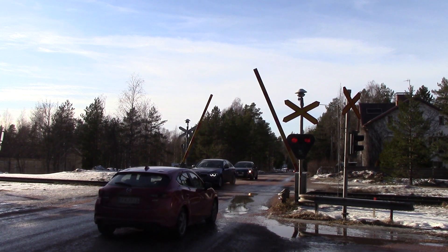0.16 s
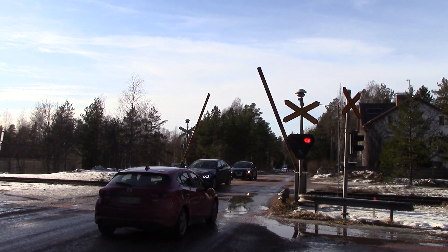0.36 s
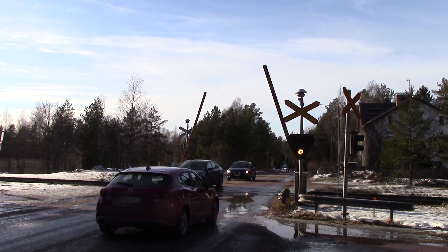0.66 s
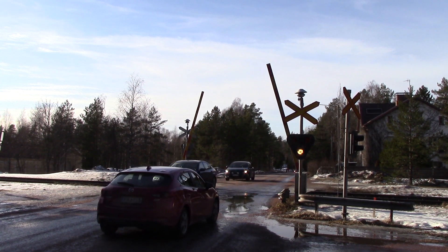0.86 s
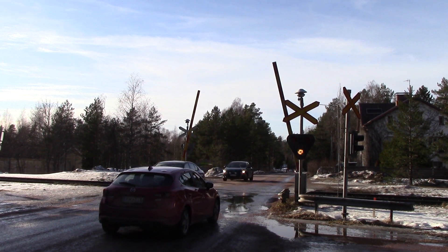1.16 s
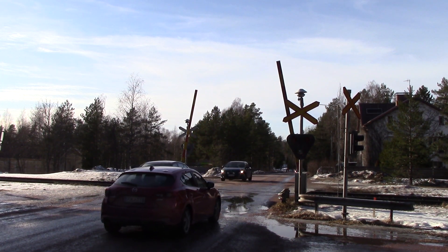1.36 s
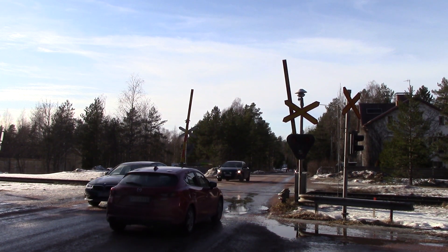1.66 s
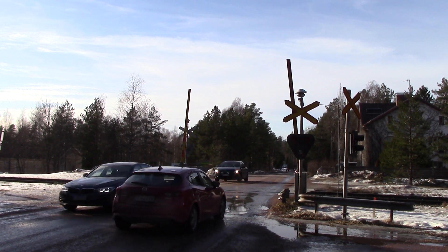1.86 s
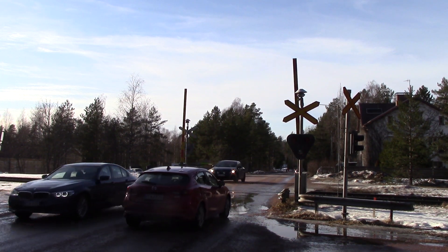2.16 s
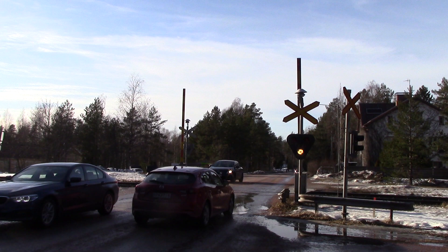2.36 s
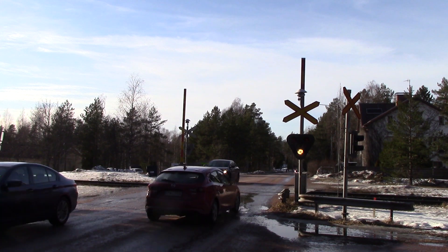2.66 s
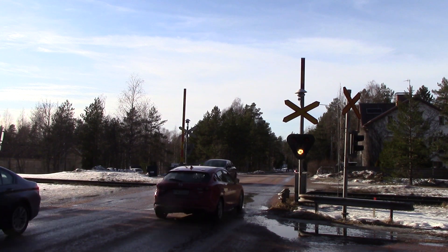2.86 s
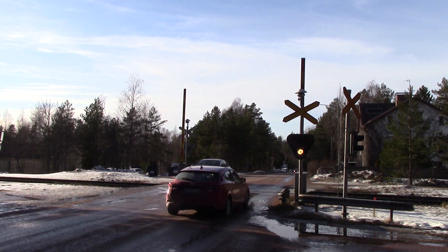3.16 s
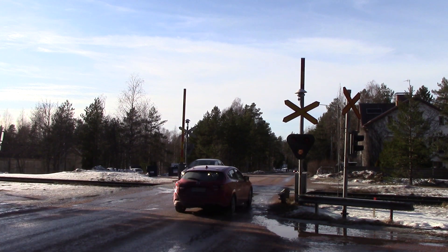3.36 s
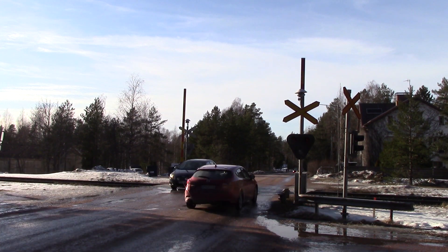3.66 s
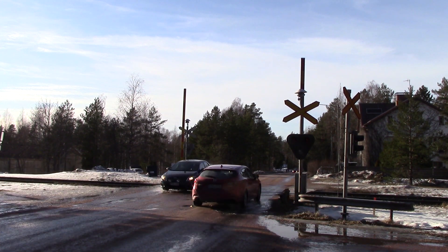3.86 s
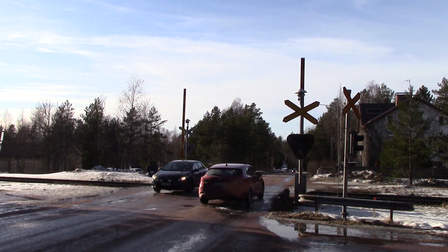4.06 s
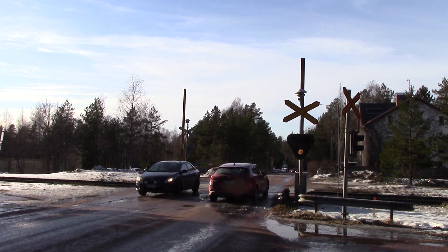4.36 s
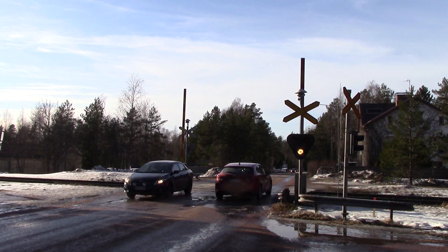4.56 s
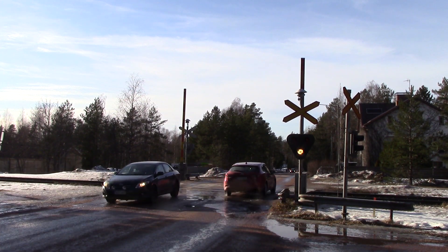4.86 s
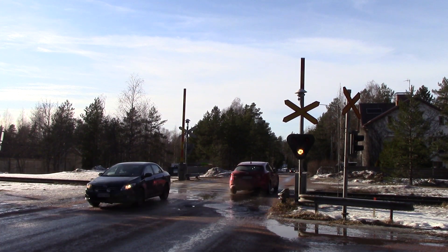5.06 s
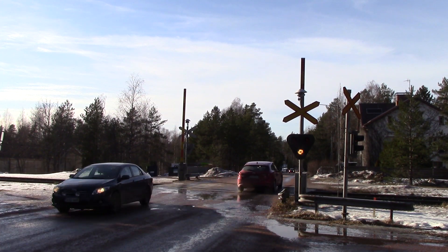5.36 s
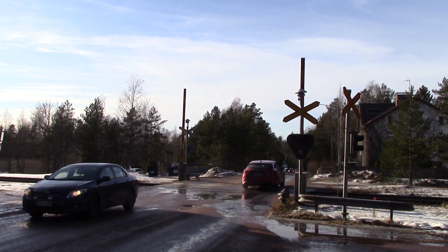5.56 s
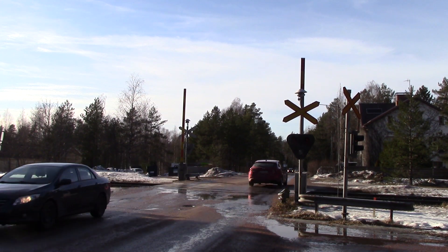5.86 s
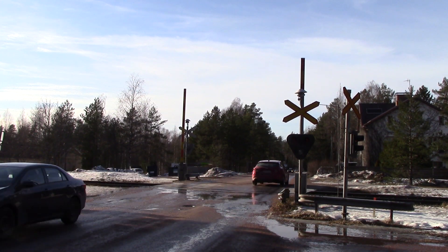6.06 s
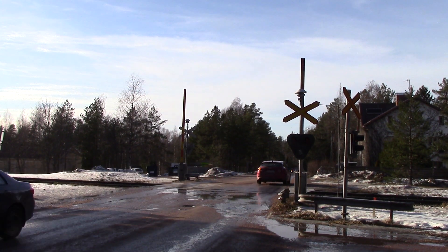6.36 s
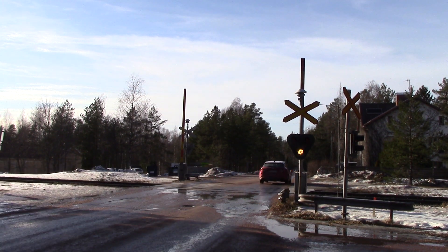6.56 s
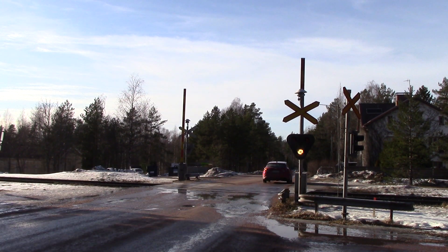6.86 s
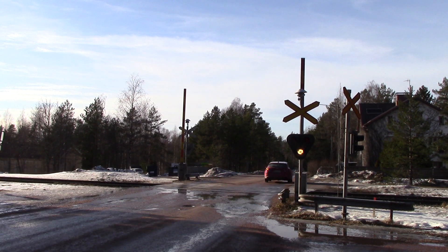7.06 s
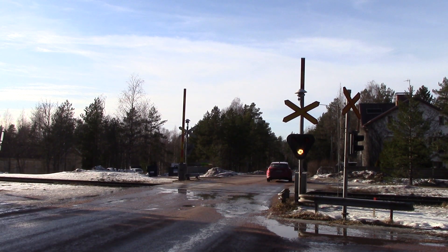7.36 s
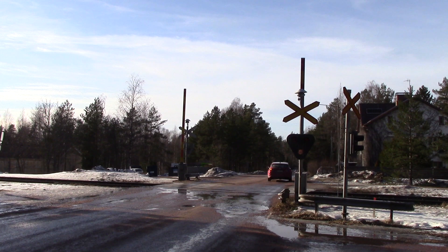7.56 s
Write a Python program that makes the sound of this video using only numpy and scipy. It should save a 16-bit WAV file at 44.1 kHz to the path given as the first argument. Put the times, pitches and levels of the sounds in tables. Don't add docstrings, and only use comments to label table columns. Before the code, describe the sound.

Outdoors at a wet rail crossing, a waiting car hums briefly while another rolls over the rails with dull body thumps and small splashes. It passes on the left in a rush of water hiss and eases away. A second car follows, louder and grittier, its tyres crackling sharply close by. A small stereo microphone stands at the roadside with faint distant traffic behind.

```python
import sys
import numpy as np
from scipy import signal
from scipy.fft import rfft, irfft, next_fast_len
from scipy.io import wavfile
from scipy.ndimage import uniform_filter1d

SR = 44100
rng = np.random.default_rng(int(sys.argv[2]) if len(sys.argv) > 2 else 0)


def nominal_scale(level):
    x = np.asarray(level, float) / 20
    return 10 ** x


def to_wav(sig):
    pcm = np.clip(np.atleast_2d(sig), -1, 1) * 32767
    pcm = np.round(pcm).astype(np.int16)
    wavfile.write(sys.argv[1], SR, pcm.T)


N = 340363
T = np.arange(N) / SR
SIZE = next_fast_len(N, True)
HZ = np.fft.rfftfreq(SIZE, 1 / SR) + 1e-3

# low_hz, high_hz
BANDS_HZ = [(70, 170), (170, 380), (400, 800), (900, 1350), (1400, 2100), (2300, 4200), (4800, 6800),
            (7000, 9000), (9500, 12000), (12500, 15000)]
# time_s, how far round to the left (0-1), sound from all round_db
BEARING = [(0, 0.2, 3), (1, 0.14, 6), (1.8, 0, 3), (2.5, 0.13, -3), (3.2, 0.46, -4), (3.9, 0.89, -14),
           (4.5, 0.45, -8), (5.1, 0.14, -2), (5.8, 0.1, 1), (6.4, 0.45, -5), (7, 1, -3), (7.4, 1.1, 1),
           (7.72, 0.9, 4)]


def curve(table):
    s, *columns = np.transpose(table)
    return [np.interp(T, s, column) for column in columns]


def colour(points):
    hz, db = np.transpose(points)
    return nominal_scale(np.interp(np.log(HZ), np.log(hz), db))


def tint(x, gain):
    return irfft(rfft(x, SIZE) * gain, SIZE)[..., :N]


def ring(x, hz, q):
    b, a = signal.iirpeak(hz, q, SR)
    return signal.lfilter(b, a, signal.lfilter(b, a, x))


def knock(t, hz, t60, rise):
    swell = (1 - np.exp(-t / rise)) * np.exp(-np.log(1000) * t / t60)
    wave = swell * np.sin(2 * np.pi * hz * t * (1 + 0.033 * t / t60))
    return wave / wave.max()


def fade(x, t60):
    return signal.lfilter([1], [1, -np.exp(-np.log(1000) / (t60 * SR))], x)


def walk(rate):
    hold = int(SR / rate)
    steps = np.repeat(rng.standard_normal(N // hold + 1), hold)
    smooth = uniform_filter1d(uniform_filter1d(steps, hold), hold)[:N]
    return smooth / smooth.std()


def bursts(rate, spread_db, t60):
    when, size = rng.random((int(rate * N / SR), 2)).T
    kicks = np.zeros(N)
    np.add.at(kicks, (when * (N - 1)).astype(int), nominal_scale(-spread_db * np.log(1 - size)))
    swell = np.sqrt(fade(kicks, t60) + 1e-9)
    return (swell - swell.mean()) / swell.std()


def waiting_car():
    hum = 0
    for hz, q, db in [(590.0, 2.1, -13.5), (1660.0, 8.8, -16)]:
        hum = hum + nominal_scale(db) * ring(rng.standard_normal(N), hz, q)
    return hum * np.interp(T, [1.2, 2.2], [1, 0])


def thumps():
    # start_s, peak_db, pitch_hz
    drops = [(0.865, -22.5, 274), (0.899, -29, 264), (1.079, -20, 242), (1.115, -22, 264),
             (1.168, -26, 264), (1.252, -34, 218), (1.314, -18.5, 172), (1.414, -27, 383),
             (1.475, -21, 263), (1.507, -27, 262), (1.545, -23, 262), (1.574, -20, 261), (1.611, -14, 295),
             (1.63, -14, 204), (1.743, -23, 186), (3.299, -35, 310), (3.504, -25, 266), (3.544, -25, 210),
             (3.789, -28, 301), (3.843, -24, 300), (3.896, -22, 298), (3.959, -20, 312),
             (4.012, -19.5, 292), (4.049, -18, 293), (4.199, -38, 280), (7.419, -31, 342)]
    out, t = np.zeros(N + SR), np.arange(int(.08 * SR)) / SR
    for s, peak_db, hz in drops:
        i = int(s * SR)
        out[i:i + len(t)] += nominal_scale(peak_db + 2.3) * knock(t, hz, t60=0.028, rise=0.0025)
    return out[:N]


def splashes():
    # start_s, peak_db, fade by 60 dB_s, brightest_hz
    puddles = [(0.602, -19.5, 0.3, 5340), (0.6767, -22, 0.21, 6050), (0.81, -23.5, 0.17, 5720),
               (0.85, -23, 0.3, 7300), (0.956, -17.5, 0.16, 7700), (1.096, -22.5, 0.22, 4920),
               (1.187, -20, 0.23, 5500), (1.2585, -34, 0.3, 4760), (1.4246, -21.5, 0.49, 5360),
               (1.4832, -18.5, 0.57, 6200), (1.7183, -30, 0.21, 5700), (2.394, -26, 0.26, 5800),
               (2.5766, -18, 0.18, 7400), (3.4203, -16, 0.13, 6910), (3.829, -14.5, 0.3, 5900),
               (4.5994, -36, 0.3, 4790), (4.8524, -19.5, 0.96, 6060)]
    out, t = np.zeros(N + SR), np.arange(int(.4 * SR)) / SR
    for s, db, t60, hz in puddles:
        swell = (1 - np.exp(-t / 0.00051)) * np.exp(-np.log(1000) * t / t60)
        bright, dull = rng.standard_normal((2, len(t))) * swell
        i = int(s * SR)
        out[i:i + len(t)] += nominal_scale(db - 3) * (ring(bright, hz, 1.53) + 1.77 * ring(dull, 2880.0, 1.4))
    shade = [(3800, 3.0), (4800, 1.0), (5900, 0.5), (8500, 1.0), (12000, -10), (16000, -14)]  # (Hz, dB)
    return tint(out[:N], colour(shade))


def grit(cavity_db):
    when, size, pitch = rng.random((1400, 3)).T
    out = 0
    for k, (hz, db) in enumerate([(1050., -12), (1500., 6.0), (2300., 10.5), (3300., -8)]):
        kicks = np.zeros(N)
        mine = (pitch * 4).astype(int) == k
        strength = nominal_scale(db - 4.4 * np.log(1 - .97 * size[mine]))
        np.add.at(kicks, (when[mine] * (N - 1)).astype(int), strength)
        out = out + ring(kicks, hz, 1.12)
    return out * nominal_scale(cavity_db + 20.0)


def cracks(cavity_db):
    # start_s, peak_db, ring_hz
    first = [(0.118, -7, 1200), (0.183, -7, 1170), (0.341, -20, 1700), (0.405, -16, 1330),
             (0.454, -18, 969), (0.527, -15, 1670), (0.717, -16, 1610), (0.761, -15, 1290),
             (1.094, -16, 1210), (1.164, -12, 1270), (1.245, -10, 1730), (1.305, -15, 1590),
             (1.389, -14, 1180), (1.411, -11, 1160), (1.566, -6, 1190), (1.587, -12, 1210),
             (1.619, -6, 1180), (1.741, -12, 1050), (2.19, -8, 1950), (2.545, -12, 1050), (2.579, -9, 1150),
             (2.881, -8, 2740), (3.01, -8, 1590), (3.378, -6, 3400)]
    # start_s, peak_db, ring_hz
    coming = [(4.124, -9, 1250), (4.324, -9, 1840), (4.531, -4, 1320), (4.542, -9, 1710), (4.652, -7, 1500),
              (4.835, -9, 1320), (4.852, -1, 1710), (5.049, -9, 1170), (5.098, -2, 1320), (5.138, -2, 1600),
              (5.178, -6, 1200), (5.197, -3, 1280), (5.255, -7, 1280), (5.3, -8, 1750), (5.31, -3, 1440),
              (5.372, -4, 1880), (5.428, -4, 1410), (5.436, -3, 1740), (5.607, -8, 1250), (5.688, -6, 1300),
              (5.727, 1, 1170), (5.764, -1, 1660), (5.771, -5, 1730), (5.776, -5, 1060), (5.822, -9, 1290),
              (5.874, -5, 1290), (5.928, -7, 1300), (6.01, 0, 1400), (6.032, -3, 1290), (6.097, -1, 1150)]
    # start_s, peak_db, ring_hz
    alongside = [(6.42, -1, 2070), (6.452, -2, 1590), (6.477, -2, 1610), (6.502, 0, 1100),
                 (6.548, -3, 1490), (6.567, -2, 1230), (6.622, -3, 1070), (6.691, -4, 1130),
                 (6.731, -2, 1180), (6.793, -4, 1030), (6.825, 0, 1350), (6.83, -2, 1100), (6.861, 0, 1060),
                 (6.866, -4, 1830), (6.883, -3, 1250), (6.894, -3, 1360), (6.917, -1, 1100),
                 (6.966, -1, 1130), (6.995, -3, 1170), (7.098, -1, 1160), (7.14, -3, 1930),
                 (7.178, -1, 1220), (7.213, 1, 1340), (7.264, -5, 1030), (7.32, 0, 1080), (7.344, -4, 1000),
                 (7.407, -6, 1590), (7.51, -4, 1230), (7.548, -1, 1220), (7.63, -3, 1400)]
    late_s, cycles, road_peaks_db = .0006, 10, 13
    out, t = np.zeros(N + SR), np.arange(int(.06 * SR)) / SR
    sagging = t + .45 * .001 * (1 - np.exp(-t / .001))
    for s, db, hz in list(first) + list(coming) + list(alongside):
        scatter = rng.standard_normal(len(t)) * (1 - np.exp(-t / .002)) * np.exp(-t / .011)
        rattle = nominal_scale(2 + .5 * db) * ring(scatter, hz, .9)
        snap = 1.25 * knock(sagging, .9 * hz, cycles / hz, .0004)
        tick = .45 * knock(t, min(1.9 * hz, 3200), .0025, .0002)
        i = int((s + late_s) * SR)
        power = nominal_scale(2 * db) - nominal_scale(2 * (cavity_db[i] + road_peaks_db))
        size = np.sqrt(max(power, .2 * nominal_scale(2 * db)))
        out[i:i + len(t)] += size * (snap + tick + rattle)
    band = signal.butter(2, [480, 4500], "bandpass", fs=SR, output="sos")
    return signal.sosfilt(band, out[:N])


def band_centres():
    return np.log([np.sqrt(lo * hi) for lo, hi in BANDS_HZ])


def band_levels():
    # time_s, rolling_db, water thrown_db
    first_car = [
        (0, -7, -23),
        (0.7, -9.5, -20.5),
        (1.3, -2, -12.5),
        (1.9, -3.5, -5.5),
        (2.4, -4, 0.5),
        (3.0, 0, 0.5),
        (3.9, -1, 1),
        (4.7, -4, -0.5),
        (7.72, -30, -25),
    ]
    # time_s, rolling_db, water thrown_db
    second_car = [
        (0, -28, -40),
        (3.6, -17, -24),
        (4.7, -6, -9.5),
        (5.3, -2, -3.5),
        (5.8, -2, -1.5),
        (6.4, 1, 1.5),
        (6.9, 2.2, 3),
        (7.3, 1, -2.5),
        (7.72, -0.5, -10),
    ]
    # time_s, level_db
    rumble = [(0, -14), (.75, -10), (1.03, 0), (1.4, -2.5), (1.61, 8), (1.76, -8), (2.1, -17), (2.6, -17),
              (2.95, -9), (3.3, -7), (3.5, -1), (3.93, 0), (4.25, -6), (4.5, -13), (5.5, -13), (6.3, -6),
              (7.2, -4), (7.72, -6)]
    # pitch_hz, band level_db
    first_tread = [(110, -51), (250, -52.5), (570, -34.5), (1100, -30.5), (1700, -27), (3100, -31),
                   (5700, -53), (14000, -80)]
    second_tread = [(110, -63), (250, -40), (570, -35.5), (1100, -24.5), (1700, -21), (3100, -27.5),
                    (5700, -44), (14000, -75)]
    # pitch_hz, band level_db
    first_water = [(570, -61), (1700, -35), (3100, -25.5), (5700, -33.5), (7900, -35), (10700, -43),
                   (14000, -56)]
    second_water = [(570, -63), (1700, -38), (3100, -25.5), (5700, -34.5), (7900, -31), (10700, -42),
                    (14000, -57.5)]
    # pitch_hz, band level_db
    body = [(110, -45), (250, -32.5), (570, -38.5), (1100, -55), (14000, -120)]
    # pitch_hz, band level_db
    far_traffic = [(110, -62), (250, -55), (570, -32), (1100, -40), (3100, -73), (7900, -50.5),
                   (14000, -72)]
    # pitch_hz, gain_db
    from_left = [(110, 2.7), (1100, 1.6), (1700, -2.1), (3100, 1.15), (5700, 2), (7900, -5.5), (10700, -4),
                 (14000, 6)]
    centres = band_centres()

    def at(points):
        hz, db = np.transpose(points)
        return np.interp(centres, np.log(hz), db)[:, None]

    roll1, wet1 = curve(first_car)
    roll2, wet2 = curve(second_car)
    shake, = curve(rumble)
    parts = [at(first_tread) + roll1, at(first_water) + wet1,
             at(second_tread) + roll2, at(second_water) + wet2,
             at(body) + shake, at(far_traffic) + 0 * T]
    power = sum(nominal_scale(2 * part[:, ::64]) for part in parts)
    total_db = 10 * np.log10(power).repeat(64, axis=1)[:, :N]
    return total_db + at(from_left) * curve(BEARING)[0]


def road(levels):
    # pitch_hz, db per Hz
    low = [(24, -68), (40, -13), (130, -0.5), (246, -4), (393, -8), (436, -4.5), (475, -4.5), (555, -2.5),
           (707, -4.5), (1020, 0), (1300, 0), (1860, -1), (2500, -2), (3250, -34), (5500, -120)]
    # pitch_hz, db per Hz
    high = [(1470, -30), (2500, -2.5), (3420, -3), (3810, -4), (4510, -11), (5100, -10), (5890, -7.5),
            (7080, -9), (8070, -10), (12200, -30), (14000, -33), (15600, -44)]
    # pitch_hz, level_db
    diffuse = [(30, -10), (100, -35), (300, -43), (1000, -32), (2500, -32.5), (5000, -13.5), (9000, -21),
               (15000, -12)]
    flicker_db = [0.55, 1.6, 0.68, 1.28, 0.5, 0.17, 0.89, 0.36, 1.7, .7]
    burst_share = [.1, 0.15, 0.15, 0.92, 0.87, 0.51, 0.47, 0.9, 0.66, .3]
    shape = np.where(HZ < 2500, colour(low), colour(high) * nominal_scale(2))
    centres = band_centres()
    water = 0.81 * bursts(60., 4.4, 0.096) + 2.15 * bursts(600., 2.33, 0.0081)
    noise = rfft(rng.standard_normal((2, SIZE))) * [shape, shape * colour(diffuse)]
    out = 0
    for k, (lo, hi) in enumerate(BANDS_HZ):
        share = np.interp(np.log(HZ), centres, np.arange(len(centres)) == k)
        inside = (HZ > lo) & (HZ < hi)
        rms = np.sqrt(2 * np.sum(np.abs(noise[0, inside]) ** 2)) / SIZE
        db = levels[k] + flicker_db[k] * walk(14) + burst_share[k] * water
        out = out + nominal_scale(db) * irfft(noise * share, SIZE)[:, :N] / rms
    return out


def scene():
    # pitch_hz, gain_db
    from_front = [(4200, -0.15), (5000, -1.5), (5900, 2.5), (6800, -2), (7800, 2), (9000, 0), (10500, .1)]
    # pitch_hz, level_db
    port_lag = [(300, -37), (1000, -43), (2500, -35), (5000, -2), (7000, -7.5), (10000, 1.5), (13500, -1),
                (15000, -22)]
    # pitch_hz, level_db
    port_shade = [(300, -40), (1000, -32), (2500, -18), (4000, -10.5), (8000, -33), (15000, -35)]
    levels = band_levels()
    cavity_db = levels[3]
    rolling, around = road(levels)
    mid = rolling + cracks(cavity_db) + thumps() + grit(cavity_db) + splashes() + waiting_car()
    bearing, spread_db = curve(BEARING)
    ahead = np.clip(1.2 - 2 * bearing, 0, 1)
    mid = mid + (tint(mid, colour(from_front)) - mid) * ahead
    leaning = tint(mid, 1j * colour(port_lag) - colour(port_shade)) * bearing
    side = around * nominal_scale(spread_db) + leaning
    return np.array([mid + side, mid - side])


def roll_off(x):
    return signal.sosfilt(signal.butter(12, 15730, fs=SR, output="sos"), x)


def record(dry):
    # pitch_hz, gain_db
    mic = [(30, -22), (60, -16.5), (110, -6.5), (200, -2.5), (9000, -1), (16000, -2)]
    heard = np.tanh(0.54 * tint(dry, colour(mic))) / 0.66
    return roll_off(heard)


dry = scene()
out = record(dry)
to_wav(out)
```